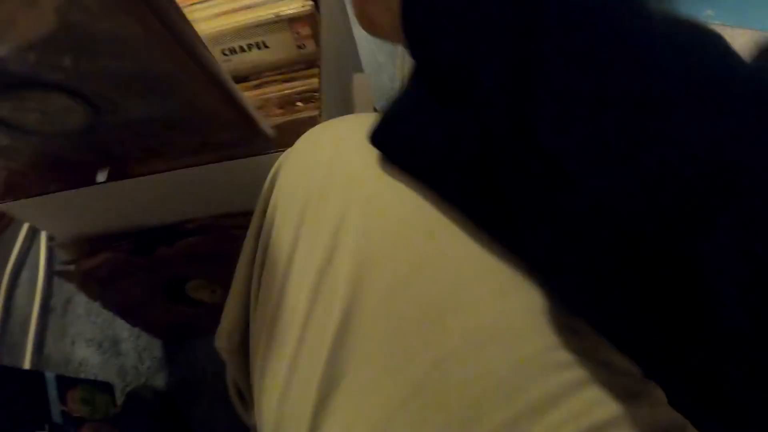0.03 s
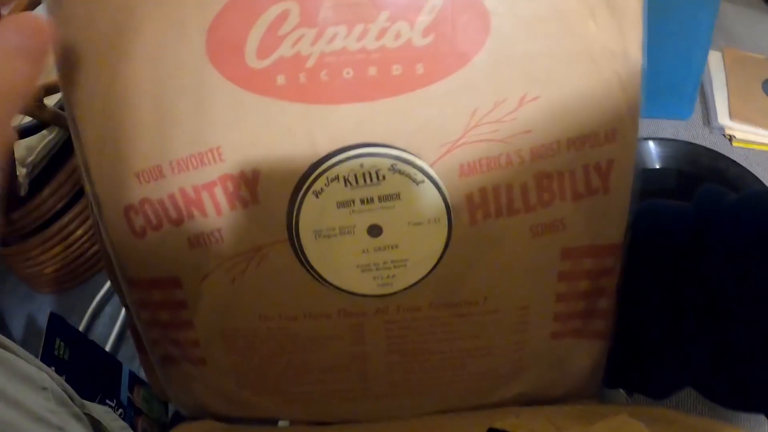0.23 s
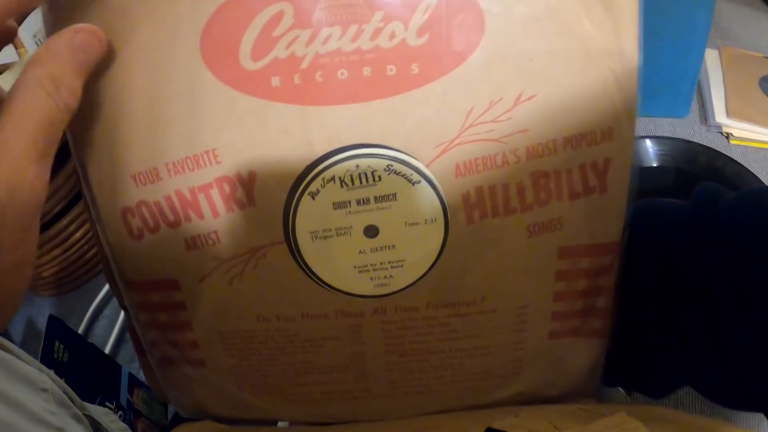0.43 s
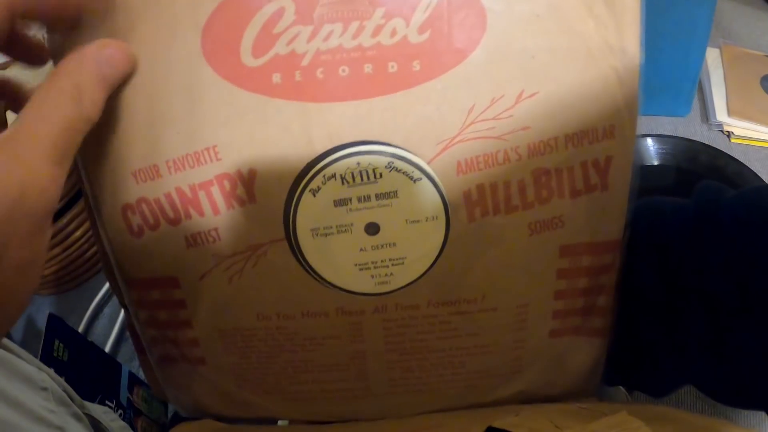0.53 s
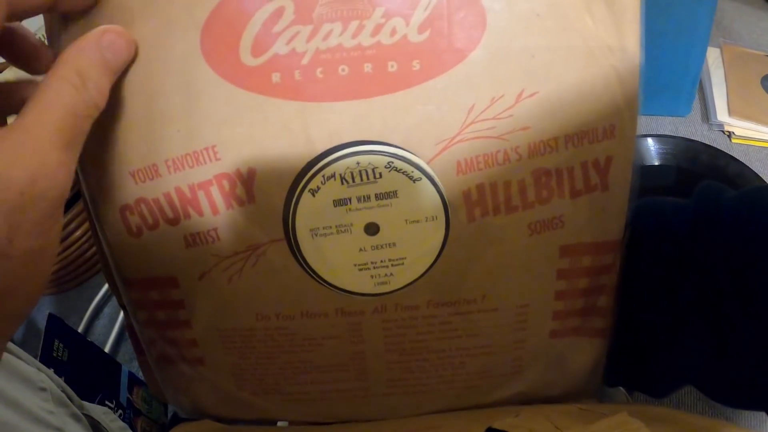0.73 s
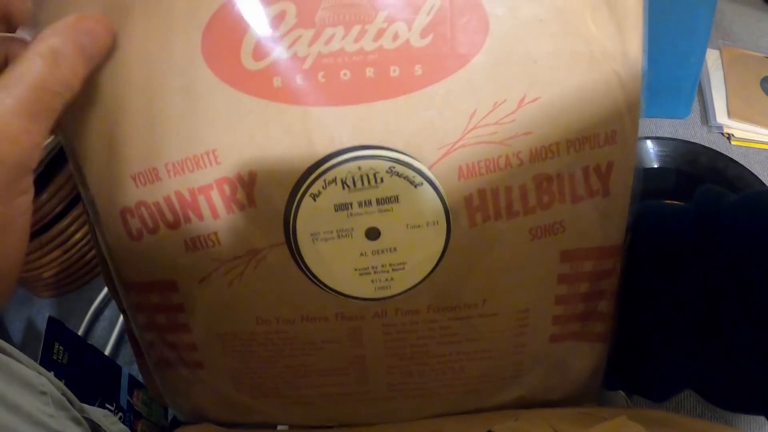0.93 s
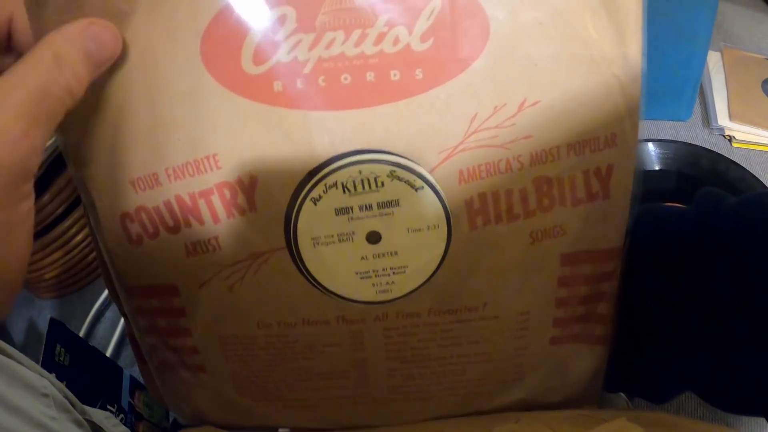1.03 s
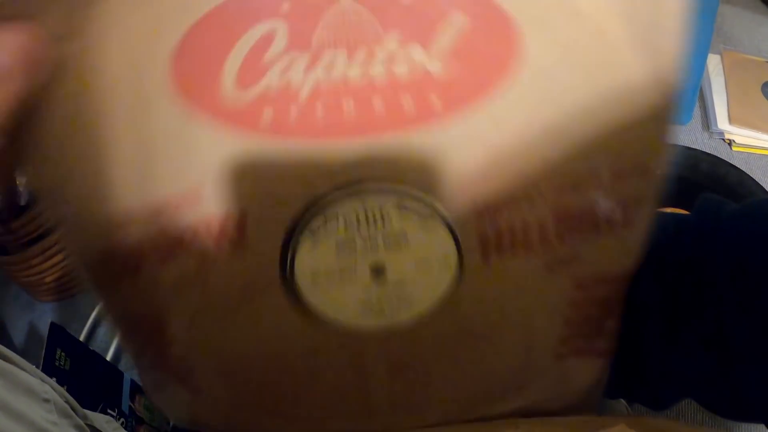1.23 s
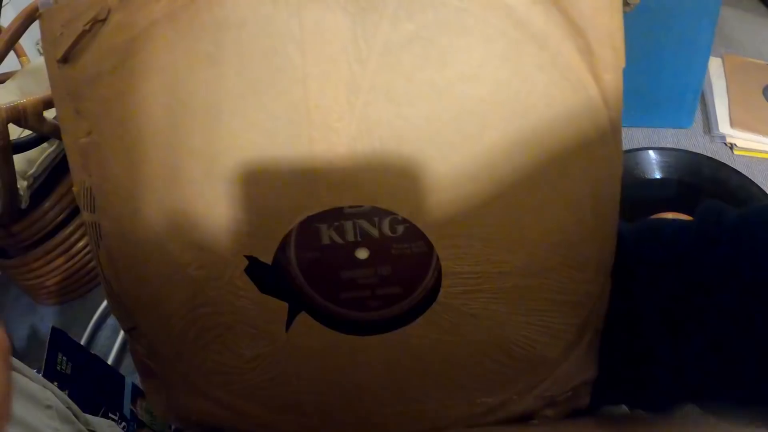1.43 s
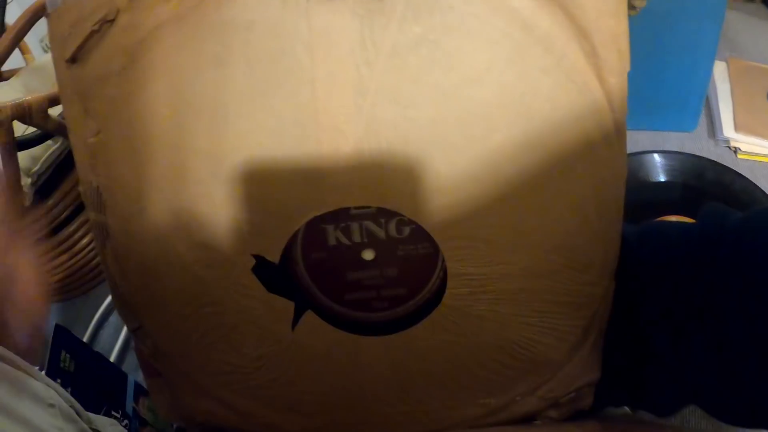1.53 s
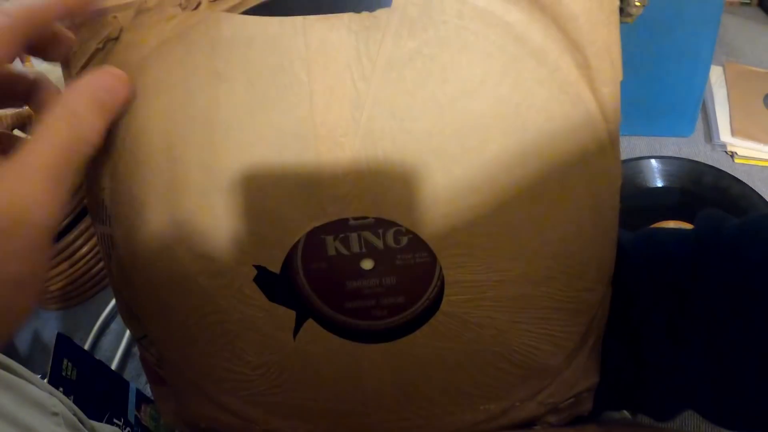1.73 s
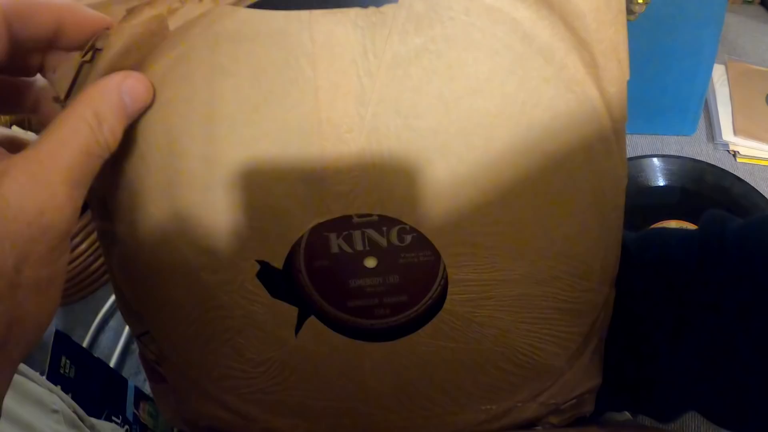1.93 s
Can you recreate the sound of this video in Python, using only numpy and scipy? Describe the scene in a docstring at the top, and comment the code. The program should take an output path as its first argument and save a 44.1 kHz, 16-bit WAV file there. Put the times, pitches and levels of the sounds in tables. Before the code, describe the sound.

Paper sleeves of discs being flipped by hand, close and dry in a quiet room. A brief rustle and hollow taps lead to the strongest low thud near 0.2 s. Sparse crisp snaps follow at 0.5 and 0.75 s, then the sharpest snap at 1.2 s. Rustling swells around 1.4 s, with a softer tumbling run of thuds at 1.5-1.6 s, a lull, and bright crinkles from 1.9 s. Faint hiss underneath.

```python
"""A quiet room, with paper sleeves holding discs flipped by hand close to a small microphone.
The paper snaps as short runs of tiny breaks ring its creases, and rustles as grains and hiss ring many more.
Hollow taps are dying tones; the stack thuds mainly in two runs of pushes on its low modes, as a sleeve falls.
Handling rumbles underneath in low noise, with a short room tail on the paper and a faint bed of air."""
import sys
import numpy as np
from scipy import signal
from scipy.fft import rfft, irfft
from scipy.io import wavfile

SR = 44100
rng = np.random.default_rng(int(sys.argv[2]) if len(sys.argv) > 2 else 0)


def dump_mix(stems):
    """Bounce the given channels to the path in sys.argv[1] as a 16-bit WAV at rate SR."""
    frames = np.atleast_2d(stems).T  # one column per channel
    limited = np.clip(frames, -1, 1)  # hard clip at full scale
    pcm = np.round(limited * 32767).astype(np.int16)
    wavfile.write(sys.argv[1], SR, pcm)


def boost(x):
    """Linear amplitude factor 10**(x/20) for a level x in decibels (scalar or array-like)."""
    u = np.asarray(x, float) / 20
    return 10 ** u


N = 88200  # samples, two seconds

# Snaps of the paper. Each row: time near the strongest moment in seconds, level of the crease ring in dB,
# level of the dull ring over it in dB, pitch of the crease in Hz, length of the run of breaks in ms.
SNAPS = [(0.1554, -30, -7, 3380, 3.5), (0.2205, -29, 6, 1990, 8.28), (0.4118, -48.5, -14, 6960, 3),
         (0.4513, -44, -5, 3500, 4.85), (0.5078, -25, -3.5, 4580, 9.8), (.5785, -44, -11, 7200, 4.5),
         (0.6731, -45, -17, 3430, 4), (0.7378, -35, -1.5, 4770, 4), (0.7496, -37.5, -18, 8700, 3),
         (0.7658, -21.5, -1.5, 4500, 3.9), (0.7782, -37, -10, 5000, 2.8), (0.852, -46, 3, 2280, 2.7),
         (0.907, -38, -29, 6640, 4.1), (0.972, -34, -20, 5000, 3), (0.9987, -29.5, -6, 3960, 1.7),
         (1.099, -44, 9, 3250, 4.9), (1.1192, -38, 3, 3340, 5.2), (1.1858, -17.5, 0, 3300, 2.68),
         (1.2067, -33.5, 11, 4650, 3), (1.2387, -36, 4.5, 3340, 3.2), (1.2823, -35.5, -20, 9700, 2),
         (1.3007, -38, 18, 3470, 4.35), (1.3641, -38.5, 7, 6960, 3.5), (1.3931, -29.5, 11.5, 2900, 5.1),
         (1.4032, -33, 6, 4460, 5.3), (1.4758, -39, 16.5, 1970, 3.2), (1.4906, -31.5, -25, 5130, 3.25),
         (1.6029, -25, -15, 2300, 6), (1.869, -31, -33, 7200, 3.2), (1.9187, -24.5, -15, 6300, 2.6),
         (1.921, -29.5, -15, 2860, 10.46), (1.9626, -25.5, -22, 5570, 1.5), (1.9786, -28, -23, 6160, 6.5),
         (1.99, -37, -22, 4070, 3.3)]
# Ring of the sleeve in its dull, crisp and bright ranges.
# Each row: frequency before scatter in Hz, relative level in dB, time to die by 60 dB in seconds.
DULL_MODES = [(1257, -7, 0.019), (1490, 1, 0.0038)]
CRISP_MODES = [(2300, -3, .003), (3300, -1, .004), (4500, 0, .004), (5600, -5, .003)]
BRIGHT_MODES = [(6100, 2.5, 0.00095), (9530, 5.5, 0.00075)]
# Hollow body of the sleeve. Each row: frequency before scatter in Hz, relative level in dB,
# time to die by 60 dB in seconds.
HOLLOW_MODES = [(221.4, -5, 0.04), (333.7, 1, 0.02), (490.4, -7.5, 0.022), (698, -12, 0.0086)]
# Sliding paper. Each row: time in seconds, then levels in dB of the crisp part, the dull part,
# the bright part and the hollow body.
RUSTLE = [(0, -65.5, -52, -74, -47), (.101, -66.5, -55.5, -70, -51.5), (.104, -46, -38.5, -45, -40),
          (.2, -50.5, -51.5, -56, -40), (.228, -43, -41.5, -52, -16), (.27, -62, -58, -66, -49.5),
          (.37, -71, -71.5, -78.5, -66), (.42, -72, -69.5, -67.5, -64), (.52, -53.5, -67, -57, -53),
          (.56, -72.5, -72.5, -68, -67), (.67, -66, -68.5, -60.5, -68), (.72, -74, -76, -75, -58),
          (.77, -46, -50, -44, -43), (.81, -62.5, -67, -68.5, -70), (.91, -71.5, -75, -61.5, -62.5),
          (.96, -72, -69, -74, -59.5), (1.0, -57.5, -56, -54, -53.5), (1.07, -67, -57, -66.5, -54),
          (1.27, -53, -52.5, -57.5, -50.5), (1.32, -47.5, -47.5, -54.5, -41.5),
          (1.41, -40.5, -42, -53.5, -32), (1.5, -53, -46, -56.5, -43), (1.61, -48.5, -45, -51, -36),
          (1.65, -67.5, -57.5, -71.5, -52), (1.79, -62.5, -58, -70.5, -52), (1.86, -49.5, -61, -48, -56),
          (2.0, -43, -49, -44, -47.5)]
# Hollow taps as the air pocket inside the sleeve is squeezed.
# Each row: start in seconds, level in dB before the onset and gain in taps(), pitch in Hz.
TAPS = [(.104, -28.5, 669), (.131, -30.5, 740), (.139, -33.5, 720), (0.158, -30.5, 760), (.51, -43, 273),
        (.684, -53, 440), (1.236, -42.5, 425), (1.424, -30, 648), (1.455, -37.5, 730), (1.489, -33, 707),
        (1.924, -39, 440)]
# Thuds of the stack. Each row: start in seconds, peak level in dB, length of the push in ms,
# direction (+1 or -1).
THUDS = [(0.164, -21.5, 1.7, -1), (0.208, -18.5, 2.5, 1), (.218, -6.5, 3.65, -1), (0.223, -11, 4.4, -1),
         (0.228, 0, 6.8, 1), (0.291, -13.5, 9.2, -1), (0.755, -28.5, 8.1, -1), (1.513, -22.5, 6.6, 1),
         (1.524, -12, 4.96, -1), (1.533, -10, 10.4, -1), (1.544, -12, 8.2, 1), (1.558, -17.5, 9.6, 1),
         (1.569, -11.5, 7.45, -1), (1.586, -11, 7.9, 1), (1.6, -26, 8.8, 1), (1.689, -27.5, 10, 1)]
# Low modes of the stack. Each row: frequency at the start in Hz, relative level in dB,
# time to die by 60 dB in seconds.
STACK_MODES = [(50.1, -21.5, 0.37), (77, -3, 0.13), (118.3, -8.5, 0.17), (194.9, 10.5, 0.073),
               (250.7, -8.5, 0.13)]
# Handling rumble. Each row: time in seconds, level in dB.
RUMBLE = [(0, -79), (.15, -41), (.38, -44.5), (.53, -49.5), (.7, -60.5), (.93, -50), (1.1, -72),
          (1.43, -45.5), (1.65, -34), (1.85, -72.5)]
# Spectrum of the air and microphone hiss. Each row: frequency in Hz, relative level in dB.
AIR = [(100, -7), (900, -42), (4000, -23), (15000, -50)]

SCATTER = 0.035  # spread of the mode frequencies, as a share
CREASE_CYCLES = 6  # cycles until the crease has died by 60 dB
SHEET_DB = -8  # rest of the sheet, relative to the crease
GRAINS_PER_S, GRAIN_SPREAD_DB = 2400, 4.0
HISS_DB, CLUMP_DB = -4, 2.1  # hiss relative to the grains; rms swing of the clumps
TAP_CYCLES = 15.8  # cycles until a tap has died by 60 dB
SAG, SAG_S = 0.17, 0.04  # share and time constant of the pitch drop as the pressed stack relaxes
ROOM_T60_S, ROOM_DB, ROOM_HZ = 0.06, -21, 5000  # decay, level and low-pass corner of the tail
AIR_DB = -79.5
MIC_TOP_HZ, MIC_STEP_DB, EDGE_HZ = 8910, -10.5, 15700  # centre and depth of the step; upper band limit


def evened(x):
    """Scales to rms 1."""
    return x / np.sqrt(np.mean(x ** 2) + 1e-20)


def band(x, lo_hz, hi_hz):
    """Band-pass."""
    return signal.sosfilt(signal.butter(2, [lo_hz, hi_hz], "band", fs=SR, output="sos"), x)


def curve(table, column):
    """One column of levels as gain over time, gliding in dB between rows."""
    rows = np.array(table)
    return boost(np.interp(np.arange(N) / SR, rows[:, 0], rows[:, column]))


def ring(modes, detune, size, sag=0):
    """Sum of exponentially dying sines whose pitch may sag."""
    t = np.arange(size) / SR
    bent_time = np.cumsum(1 - sag * (1 - np.exp(-t / SAG_S))) / SR
    out = np.zeros(size)
    for (hz, db, t60), factor in zip(modes, detune):
        out += boost(db - 60 * t / t60) * np.sin(2 * np.pi * hz * factor * bent_time)
    return out


def add(mix, s, sound):
    """Mixes a sound in at time s, cut off at the end of the mix."""
    part = mix[round(s * SR):][:len(sound)]
    part += sound[:len(part)]


def snaps():
    """Each snap is a short cluster of tiny breaks that rings one crease, the dull modes and the whole sheet."""
    out, t = np.zeros(N), np.arange(900) / SR
    for s, db, dull_db, crease_hz, ms in SNAPS:
        detune = 1 + SCATTER * rng.standard_normal(9)
        swell = np.sin(np.pi * np.minimum(t * 1000 / ms, 1) ** 0.62) ** 2  # rises faster than it falls
        breaks = rng.standard_normal(900) * swell
        crease = [(crease_hz, 0, CREASE_CYCLES / crease_hz)]
        parts = ((DULL_MODES, detune[:2], dull_db), (crease, [1], 0),
                 (CRISP_MODES + BRIGHT_MODES, detune[2:], SHEET_DB))
        for modes, factors, part_db in parts:
            sound = np.convolve(breaks, ring(modes, factors, 650))
            sound = boost(db + part_db) * sound / abs(sound).max()
            add(out, s - ms * 0.0002795, sound)  # starts ahead of the strongest moment
    return signal.sosfilt(signal.butter(4, 850, "high", fs=SR, output="sos"), out)


def rustle():
    """Clumps of small breaks over a friction hiss, ringing many creases."""
    out, crease_sets = np.zeros((4, N)), 8
    # the four parts swell partly together, partly on their own
    wander = rng.standard_normal((4, N)) + rng.standard_normal(N)
    clumps = boost(CLUMP_DB * evened(band(wander, 14, 70)))
    for _ in range(crease_sets):
        hits = (rng.random(N) < GRAINS_PER_S / crease_sets / SR) * rng.choice([-1, 1], N)
        for k, modes in enumerate((CRISP_MODES, DULL_MODES, BRIGHT_MODES, HOLLOW_MODES)):
            grains = hits * boost(GRAIN_SPREAD_DB * np.minimum(rng.exponential(1, N), 4))
            hiss = boost(HISS_DB) * rng.standard_normal(N)
            drive = clumps[k] * (evened(grains) + hiss)
            detune = 1 + 3 * SCATTER * rng.standard_normal(4)
            out[k] += signal.oaconvolve(drive, ring(modes, detune, 1900))[:N]
    edges_hz = ((1800, 4730), (830, 4500), (4950, 20000), (125.0, 2140))
    return sum(evened(band(out[k], *edges_hz[k])) * curve(RUSTLE, k + 1) for k in range(4))


def taps():
    """The squeezed air pocket sounds a soft-edged dying tone for each hollow tap."""
    out, t = np.zeros(N), np.arange(3000) / SR
    for s, db, hz in TAPS:
        decay = boost(db - 60 * t * hz / TAP_CYCLES)
        onset = 1 - np.exp(-t * hz / 0.44)  # time constant of 0.44 cycles
        add(out, s, 3 * decay * onset * np.sin(2 * np.pi * hz * t))
    return out


def thuds():
    """Soft pushes, heard through the low modes of the stack, which sag in pitch."""
    out = np.zeros(N)
    body = ring(STACK_MODES, np.ones(len(STACK_MODES)), 8000, SAG)
    for s, db, ms, direction in THUDS:
        push = np.hanning(round(ms * SR / 1000) + 2)
        sound = np.convolve(push, body)
        add(out, s, direction * boost(db) * sound / abs(sound).max())
    return out


def rumble():
    """Low band of noise from hands on the stack, rising and falling in level."""
    return evened(band(rng.standard_normal(N), 26.7, 74.3)) * curve(RUMBLE, 1)


def room(x):
    """Short dull tail of sparse reflections, dying exponentially."""
    t = np.arange(8000) / SR
    sparse = rng.choice([-1, 1], 8000) * (rng.random(8000) < 0.06)
    reflections = sparse * boost(-60 * t / ROOM_T60_S) * (t > 0.002)
    reflections = signal.lfilter(*signal.butter(1, ROOM_HZ, fs=SR), reflections)
    return boost(ROOM_DB) * signal.oaconvolve(x, reflections / np.linalg.norm(reflections))[:N]


def air():
    """Room air and microphone hiss: steady noise, strongest low, thin near 900 Hz, fuller near 4 kHz, then fading."""
    f, db = np.transpose(AIR)
    hz = np.fft.rfftfreq(N, 1 / SR)
    shape = boost(np.interp(np.log(hz + 1), np.log(f + 1), db))
    return boost(AIR_DB) * evened(irfft(rfft(rng.standard_normal(N)) * shape, N))


def scene():
    """Close paper with its room tail, then thuds, rumble and air, in one channel."""
    paper = snaps() + taps() + rustle()
    return (paper + room(paper) + thuds() + rumble() + air())[None]


def top_cut(x):
    """Nothing passes above the cut-off."""
    return signal.sosfilt(signal.butter(12, 15690, fs=SR, output="sos"), x)


def record(dry):
    """The microphone saturates softly, steps down in the treble, slopes on down and ends at a band limit."""
    hz = [0, MIC_TOP_HZ - 400, MIC_TOP_HZ + 400, EDGE_HZ - 200, EDGE_HZ, SR / 2]
    gain = [1, 1, boost(MIC_STEP_DB), boost(2 * MIC_STEP_DB), 0, 0]
    response = signal.firwin2(511, hz, gain, fs=SR)
    mix = signal.oaconvolve(np.tanh(dry), response[None], "same")
    return top_cut(mix)


dry = scene()
out = record(dry)
dump_mix(out)
```